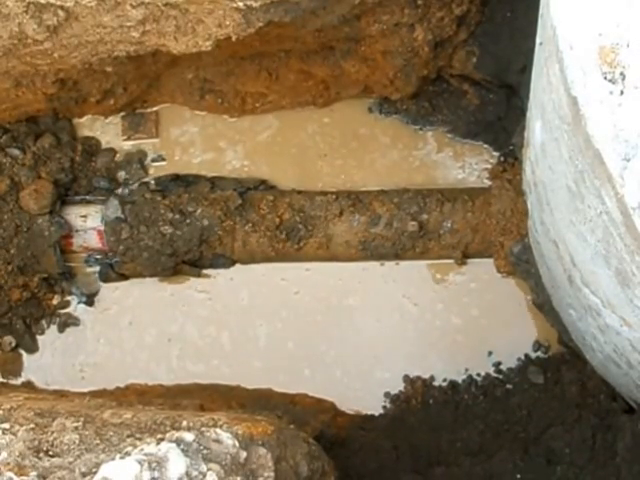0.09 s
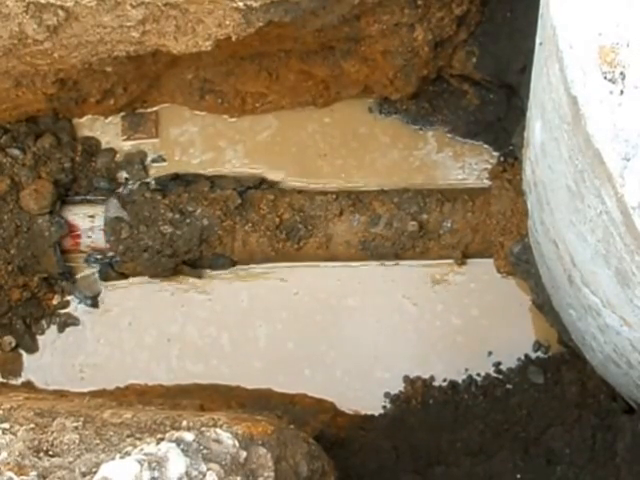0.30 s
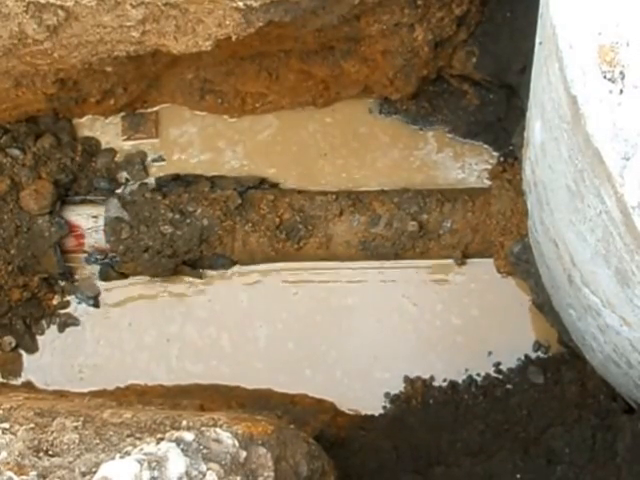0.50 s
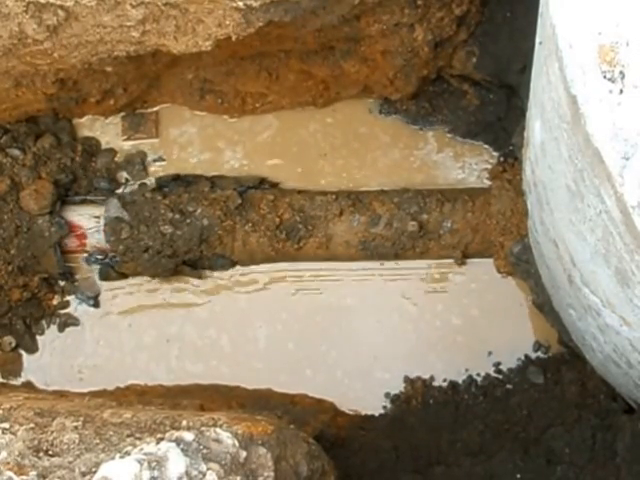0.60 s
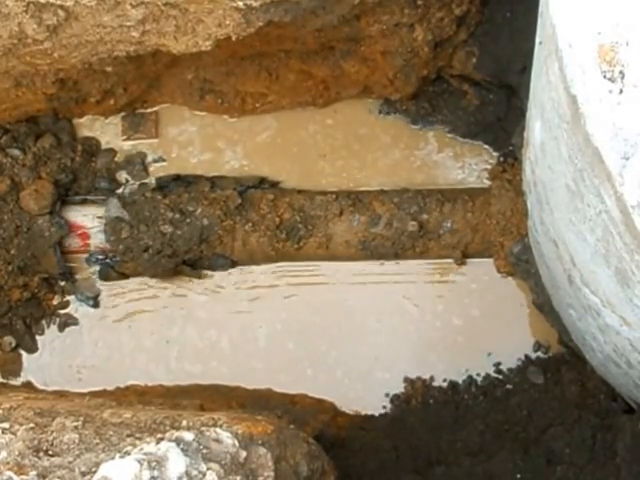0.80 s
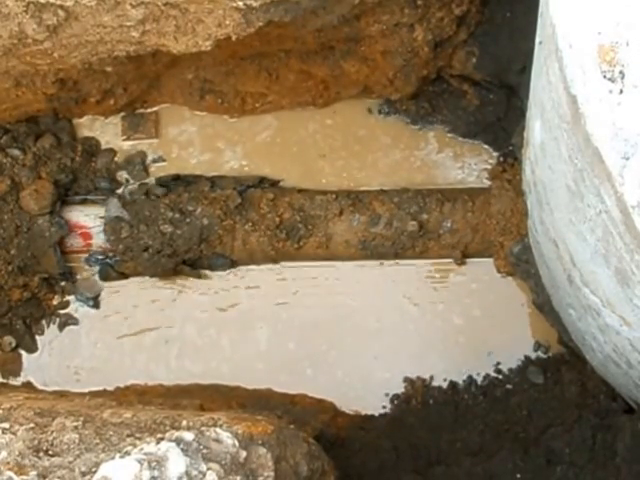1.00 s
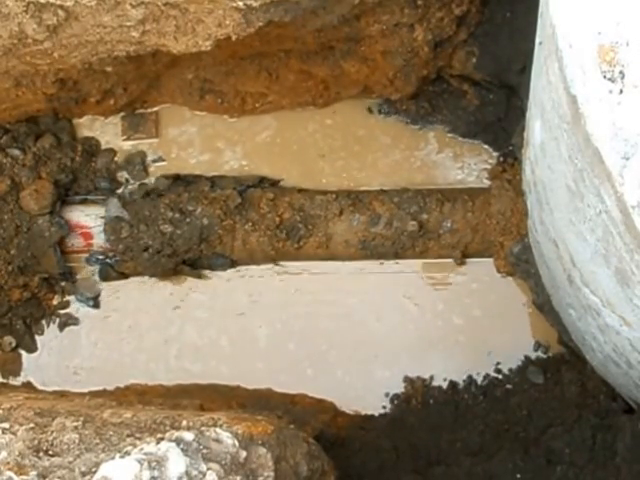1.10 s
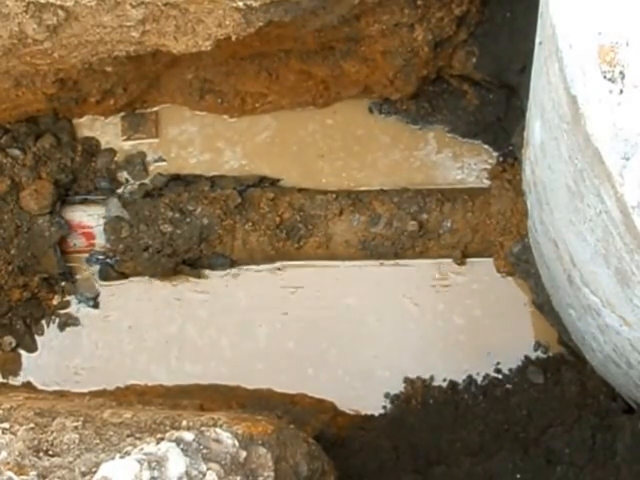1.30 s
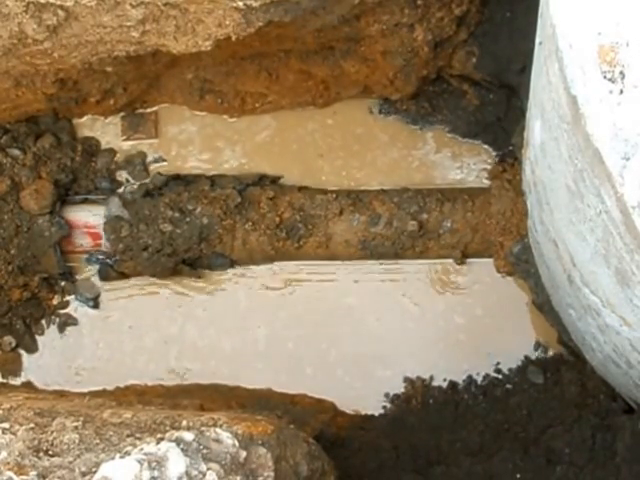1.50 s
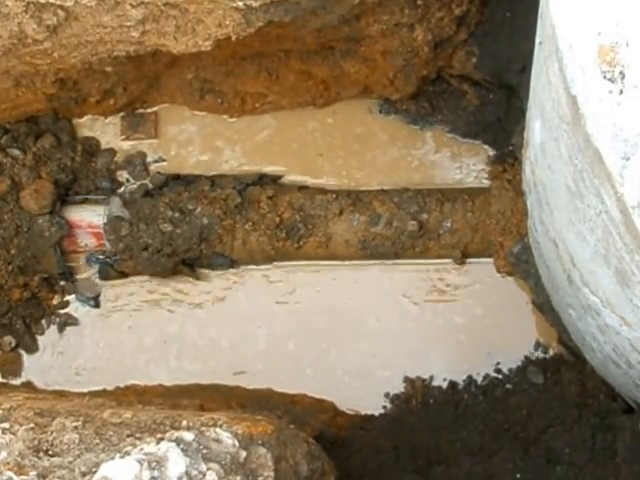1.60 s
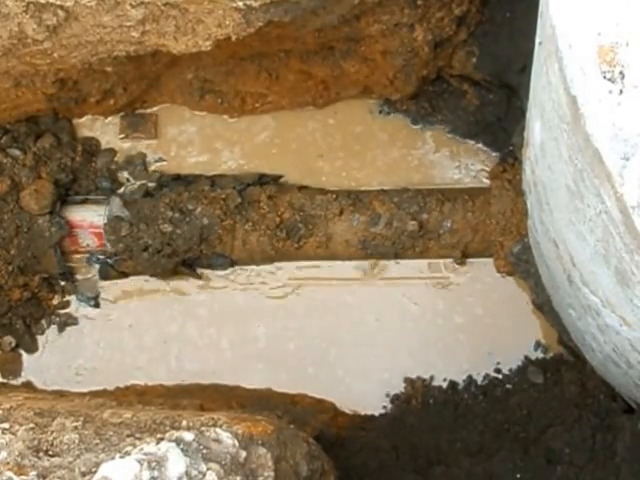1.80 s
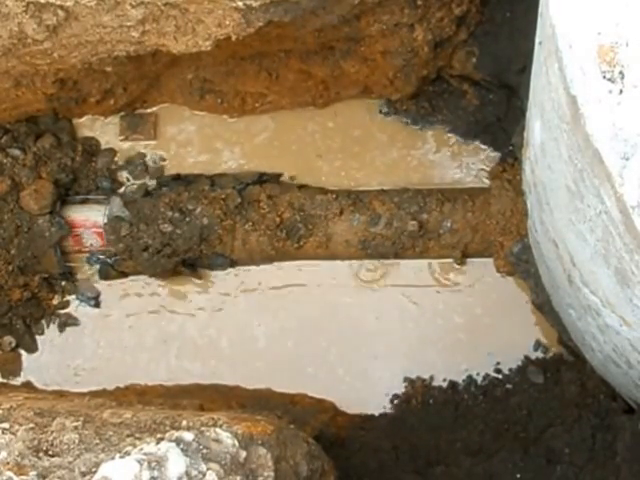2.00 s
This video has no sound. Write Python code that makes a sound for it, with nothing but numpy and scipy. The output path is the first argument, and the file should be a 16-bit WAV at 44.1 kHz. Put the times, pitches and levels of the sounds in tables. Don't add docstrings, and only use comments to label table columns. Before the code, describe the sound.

Sharp gritty concrete fractures with hollow thuds and crumbling, over a low steady engine drone

```python
import sys
import numpy as np
from scipy import signal
from scipy.fft import rfft, irfft, next_fast_len
from scipy.io import wavfile
from scipy.ndimage import uniform_filter1d, map_coordinates

SR = 44100
rng = np.random.default_rng(int(sys.argv[2]) if len(sys.argv) > 2 else 0)


def to_wav(s):
    ch = np.atleast_2d(s).T
    pcm = np.round(np.clip(ch, -1, 1) * 32767)
    wavfile.write(sys.argv[1], SR, pcm.astype(np.int16))


def volts_from_decibels(level):
    exponent = np.asarray(level, float) / 20
    return 10 ** exponent


N = 88200


def unit(x):
    return x / np.sqrt(np.mean(x ** 2) + 1e-20)


def along(points, hz):
    f, value = np.transpose(points)
    return np.interp(np.log(hz + 1), np.log(f + 1), value)


def wobble(rate):
    knots = rng.standard_normal(int(N * rate / SR) + 4)
    return map_coordinates(knots, [np.arange(N) * rate / SR])


def filtered(x, response):
    m = next_fast_len(x.shape[-1] + 8192)
    spectrum = rfft(x, m) * response(np.fft.rfftfreq(m, 1 / SR))
    return irfft(spectrum, m)[..., :x.shape[-1]]


def peak(f, hz, width):
    return 1j * f * width / (hz * hz - f * f + 1j * f * width + 1e-9)


def add_at(out, s, sound):
    out[round(s * SR):][:len(sound)] += sound


def engine():
    # time in seconds, cycle rate in Hz, hum in dB, roar in dB.
    running = [(0, 50.4, -32.5, -41), (0.178, 51.4, -37.5, -40), (0.399, 50.07, -42.5, -41),
               (0.749, 50.13, -39.5, -39.5), (1.1, 50.2, -39, -40), (1.432, 49.07, -34.5, -35),
               (1.701, 49.65, -40.5, -42.5), (2, 50.3, -45, -38.5)]
    # multiple of the cycle rate, level in dB.
    orders = [(1, -20), (2, -6), (3, -11), (4, -1.5), (6, -13), (8, -20)]
    # frequency in Hz, roar level in dB per Hz.
    roar_colour = [(18, -45), (30, -10), (146, -7.5), (212, -5), (426, -7), (855, -13), (1050, -16),
                   (4570, -21.5), (7800, -26.5), (10100, -43), (17200, -120)]
    s, *columns = np.transpose(running)
    hz, hum_db, roar_db = [np.interp(np.arange(N) / SR, s, column) for column in columns]
    turn = 2 * np.pi * np.cumsum(hz) / SR
    hum = np.zeros(N)
    for k, db in orders:
        level = volts_from_decibels(db + 2.5 * wobble(8))
        hum += level * np.sin(k * turn + 0.3 * wobble(8) + rng.uniform(0, 6))
    z = signal.stft(rng.standard_normal(N), nperseg=256)[2]
    field = uniform_filter1d(rng.standard_normal(z.shape), 5, 0)
    field = uniform_filter1d(field, 9, 1)
    patchy = signal.istft(z * volts_from_decibels(1.5 * unit(field)), nperseg=256)[1][:N]
    throbbing = patchy * (1 + 0.15 * np.cos(2 * turn))
    roar = unit(filtered(throbbing, lambda f: volts_from_decibels(along(roar_colour, f))))
    return 2 ** 0.5 * volts_from_decibels(hum_db) * hum + volts_from_decibels(roar_db + 1.2 * wobble(20)) * roar


def trench(x):
    t60_s, dull_hz = 0.35, 2500
    t = np.arange(SR // 3) / SR
    decay = rng.standard_normal(len(t)) * volts_from_decibels(-60 * t / t60_s)
    tail = filtered(decay, lambda f: 1 / (1 + 1j * f / dull_hz))
    delayed = np.pad(x, (200, 0))
    return signal.fftconvolve(delayed, tail / np.linalg.norm(tail))[:N]


def chips():
    # start in seconds, peak in dB, mode in Hz, t60 in seconds.
    flying = [(0.225, -21, 5920, 0.0196), (0.2275, -22.5, 2010, 0.092), (0.2932, -24, 5480, .03),
              (0.299, -24, 6270, 0.045), (.3367, -29.5, 5140, 0.021), (.3747, -40, 4800, 0.017),
              (0.491, -39, 2750, 0.043), (0.7007, -23.5, 1940, .025), (.6995, -23, 3360, 0.019),
              (0.9516, -35.5, 2720, 0.076), (1.1307, -27.5, 4270, 0.012), (1.1302, -27.5, 6060, 0.013),
              (1.1302, -28.5, 1930, 0.013), (1.255, -20.5, 3270, 0.021), (1.2803, -19, 1954, 0.036),
              (1.283, -22, 3440, 0.032), (1.284, -26, 1523, 0.089), (1.431, -35.5, 5280, 0.0335),
              (1.438, -20, 3380, .025), (1.427, -31, 1910, 0.028), (.2553, -2.5, 3380, 0.01),
              (0.26, -19, 1850, .02), (1.5796, -12, 5410, .012), (1.46, -26, 6350, 0.026),
              (1.478, -21.5, 1580, .1), (1.4841, -11, 5120, 0.019), (1.4839, -15, 4730, 0.026),
              (1.5602, -19.5, 4860, .025), (1.5695, -32, 3550, 0.014), (1.5815, -7, 4600, 0.012),
              (1.587, -21, 2686, 0.045), (1.585, -22, 1548, 0.11), (1.616, -32, 1978, 0.045),
              (1.632, -37.5, 1730, 0.018)]
    rise_s = 0.0008
    out, t = np.zeros(N + SR), np.arange(SR // 4) / SR
    for s, db, hz, t60 in flying:
        ring = np.sin(2 * np.pi * hz * t) + 0.3 * np.sin(2 * np.pi * 1.04 * hz * t)
        envelope = volts_from_decibels(db - 60 * t / max(t60, 0.01)) * (1 - np.exp(-t / rise_s))
        add_at(out, s, envelope * ring)
    return out[:N]


def blows():
    # start in seconds, swing in dB, boom in dB, boom in Hz, boom t60 in seconds.
    collapses = [
        (.2551, -3, -24, 340, .03),
        (.2563, -6, -40, 340, .03),
        (.2581, -30, -5, 212, .034),
        (.3025, -30, -14, 270, .02),
        (1.584, -40, -19, 140, .07),
        (1.5797, -1, -16, 335, .06),
        (1.5827, -30, -9, 212, .05),
    ]
    swing_hz, splinter_hz, splinter_t60_s = 680, 5100, 0.012
    out, t = np.zeros(N + SR), np.arange(SR // 5) / SR
    cycle = np.sin(2 * np.pi * swing_hz * t) * (t < 1 / swing_hz)
    splinter = volts_from_decibels(-3 - 60 * t / splinter_t60_s) * np.sin(2 * np.pi * splinter_hz * t)
    for s, db, boom_db, hz, t60 in collapses:
        boom = np.sin(2 * np.pi * hz * t) + 0.33 * np.sin(2 * np.pi * 2.1 * hz * t)
        boom_level = volts_from_decibels(boom_db - 60 * (t / t60) ** 2)
        add_at(out, s, volts_from_decibels(db) * (cycle + splinter) + boom_level * boom)
    return out[:N]


def hollow(f):
    # resonance in Hz, width in Hz, level in dB.
    modes = [(168, 137, 0.5), (201.6, 43.7, 5), (248.6, 40, 9), (337.4, 109, 5), (475, 150, -0.5),
             (649, 270, -10), (960, 106, -10)]
    low_cut_hz = 140
    ringing = sum((-1) ** k * volts_from_decibels(db) * peak(f, hz, width) for k, (hz, width, db) in enumerate(modes))
    return ringing * (1j * f / (low_cut_hz + 1j * f)) ** 2


def burst(x, t, rise, t60):
    shape = (1 - np.exp(-t / abs(rise))) ** 2 * volts_from_decibels(-60 * t / max(t60, 0.01))
    level = np.linalg.norm(shape) / np.linalg.norm(x * shape)
    return x * shape / shape.max() * level


def fractures():
    # time in seconds, peak in dB, thud over crack in dB, shard in Hz, t60 in seconds.
    sudden, large = [(0.3358, -41.5, -22, 5360, 0.062), (0.374, -30, 3, 4820, 0.051),
                     (0.6656, -18.5, -20, 3650, 0.087), (0.6986, -20.5, -20, 3400, 0.04),
                     (0.9475, -19, -9, 2730, 0.096), (1.0186, -22.5, -16.5, 3600, 0.035),
                     (1.043, -26, -4, 5030, 0.1), (1.072, -20, -4.5, 3750, 0.053),
                     (1.1297, -21.5, -12, 3470, 0.094), (1.2259, -31.5, -9, 5400, 0.073),
                     (1.2535, -18.5, -19.5, 3320, 0.12), (1.2799, -13.5, -9, 3460, 0.067),
                     (1.7704, -27, -15, 4370, 0.062), (1.9823, -20.5, -18.5, 4470, 0.069)], [(0.226, -4.5, -32.5, 5930, 0.014), (0.2289, -4, -10.5, 1830, 0.08),
                                     (0.2367, -8, -0.5, 3670, 0.054), (0.2431, -18, -7, 1950, 0.039),
                                     (0.251, -5, -5, 5920, 0.03), (0.2549, -1, -10.5, 3280, 0.044),
                                     (.260, -6, -8, 1830, 0.049), (.277, -18, -1, 1480, 0.1),
                                     (0.283, -15, -14, 3400, 0.076), (.292, -9, -49, 6120, 0.03),
                                     (0.298, -11.5, -4, 6400, 0.024), (1.419, -20.5, -19, 4330, 0.28),
                                     (1.432, -19, -11.5, 5800, 0.069), (1.454, -12.5, -5.5, 3090, 0.19),
                                     (1.461, -23.5, 4, 5500, 0.068), (1.475, -10, -22, 1720, 0.12),
                                     (1.4841, -10, -13.5, 4800, 0.049), (1.5567, -26, -5.5, 4800, 0.15),
                                     (1.5603, -11.5, -18.5, 4570, 0.03), (1.571, -13, -16.5, 3350, 0.022),
                                     (1.579, -6, -26, 3100, 0.1), (1.588, -11, -12.5, 1550, 0.035),
                                     (1.604, -15.5, -3, 2050, 0.092), (1.616, -11, -11.5, 1880, 0.055)]
    crumbling, more_crumbling = [(0.0896, -33.5, -4, 2890, 0.1), (0.1558, -30.5, -0.5, 5370, 0.058),
                                 (0.167, -24, -5, 3180, 0.091), (0.4717, -27, -4, 3520, 0.094),
                                 (0.4896, -32.5, -0.5, 2760, 0.11), (0.5376, -25.5, -8, 2230, 0.11),
                                 (0.5498, -21, -3, 3350, 0.072), (0.5703, -31, 1.5, 2080, 0.1),
                                 (0.6757, -23.5, 3, 1534, 0.062), (0.7059, -32, 0, 1610, 0.09),
                                 (0.7322, -26, -9, 2320, 0.063), (0.7826, -25, -10, 2900, 0.1),
                                 (0.8005, -29.5, 4, 2790, 0.1), (0.7979, -26.5, -11.5, 2730, 0.094),
                                 (0.8624, -28, 1, 2900, 0.13), (0.8884, -28, -1, 1880, 0.066)], [(0.9575, -30.5, 0.5, 1550, 0.12),
                                                      (0.9681, -31.5, 6.5, 1510, 0.08),
                                                      (1.055, -28, -9, 2120, 0.09),
                                                      (1.107, -32, -10, 2225, 0.13),
                                                      (1.1309, -27, -27, 1980, 0.13),
                                                      (1.1636, -19.5, -6.5, 1680, 0.052),
                                                      (1.2796, -22.5, -13.5, 1940, 0.1),
                                                      (1.3188, -39, 4.5, 1545, 0.05),
                                                      (1.3678, -27, -9.5, 1630, 0.1),
                                                      (1.3998, -33.5, 2, 1900, 0.067),
                                                      (1.5223, -27.5, -17, 2410, 0.12),
                                                      (1.6897, -36, -6.5, 1950, 0.1),
                                                      (1.7901, -38, -29, 4430, 0.091),
                                                      (1.8405, -35, -15, 5720, 0.1),
                                                      (1.916, -34, -32, 2070, 0.19),
                                                      (1.9551, -35, -6, 4600, 0.13),
                                                      (0.013, -35, 4, 700, .12), (0.034, -42, 4.5, 820, .2),
                                                      (.055, -33.5, -2, 880, .15),
                                                      (0.127, -32.5, 3.5, 700, .12),
                                                      (.202, -27.5, -14.5, 1210, 0.088),
                                                      (1.35, -37, 0, 1010, .1),
                                                      (1.651, -36.5, 4, 890, 0.11),
                                                      (0.927, -38, -19, 6560, 0.041),
                                                      (1.199, -39.5, -11, 5480, 0.028),
                                                      (1.505, -28, -6, 5970, .05)]
    # frequency in Hz, crack level in dB per Hz.
    concrete = [(350, 1), (700, -3), (2000, -8.5), (4000, -13), (5500, -8), (7800, -18.5), (10000, -66.5)]
    rise_s, swell = 0.00069, 0.13
    shard_q, shard_db, grit_db = 4, 9, 3
    crack_db, thud_db = -10.5, -4
    thud_rise_s, thud_longer = 0.0056, 1.16

    rows = [(*row, rise_s) for row in [*sudden, *large]]
    for s, db, thud_over_db, hz, t60 in [*crumbling, *more_crumbling]:
        rise = swell * t60
        rows.append((s - rise / 2, db, thud_over_db, hz, t60, rise))

    out, t = np.zeros(N + SR), np.arange(SR // 4) / SR
    for s, db, thud_over_db, hz, t60, rise in rows:
        white, grit, push = rng.standard_normal((3, len(t)))
        grains = white * volts_from_decibels(grit_db * unit(uniform_filter1d(grit, 40)))

        def colour(f):
            return volts_from_decibels(along(concrete, f)) * (1 + volts_from_decibels(shard_db) * peak(f, hz, hz / shard_q))

        crack = burst(filtered(grains, colour), t, rise, t60)
        thud = burst(filtered(push, hollow), t, thud_rise_s, thud_longer * t60)
        add_at(out, s, volts_from_decibels(db) * (volts_from_decibels(crack_db) * crack + volts_from_decibels(thud_over_db + thud_db) * thud))
    return out[:N]


def scene():
    pipe = fractures() + blows() + chips()
    trench_db = -23
    return (pipe + volts_from_decibels(trench_db) * trench(pipe) + engine())[None]


def band_limit(x):
    return signal.sosfilt(signal.butter(12, 8000, fs=SR, output="sos"), x)


def record(dry):
    low_hz, top_hz, top_slope_hz = 79, 7886, 90
    clip, offset = 0.94, 0.002

    def microphone(f):
        top = 0.5 - 0.5 * np.tanh((f - top_hz) / top_slope_hz)
        return top * (1j * f / (low_hz + 1j * f)) ** 2

    clipped = np.clip(filtered(dry, microphone) + offset, -clip, clip)
    mix = filtered(clipped, lambda f: f < 15900)
    return band_limit(mix)


dry = scene()
out = record(dry)
to_wav(out)
```